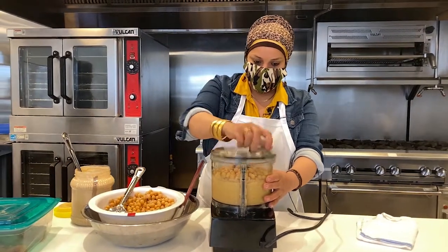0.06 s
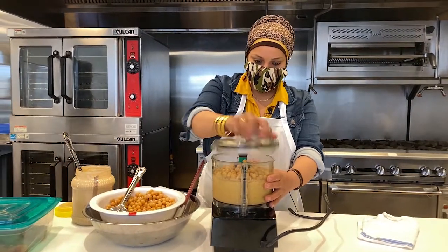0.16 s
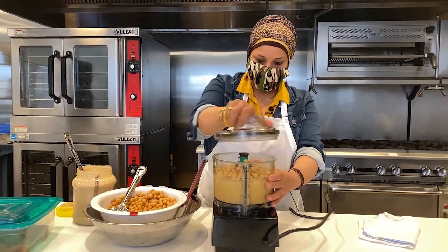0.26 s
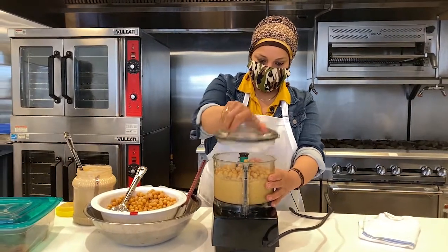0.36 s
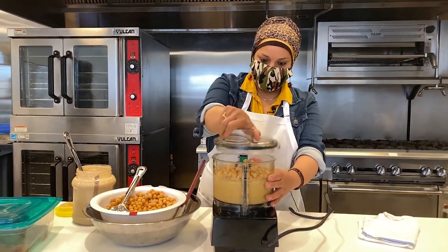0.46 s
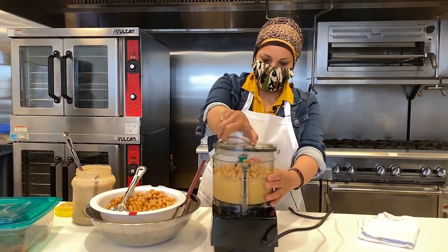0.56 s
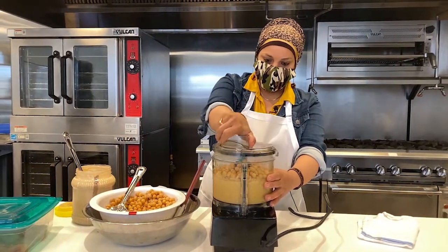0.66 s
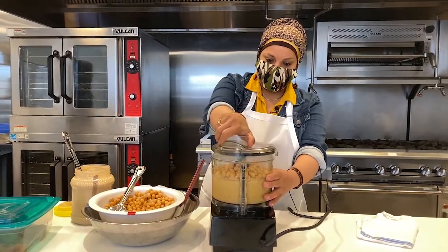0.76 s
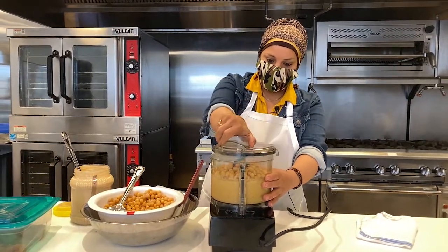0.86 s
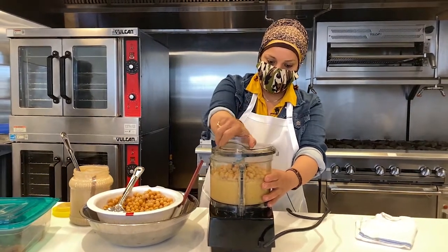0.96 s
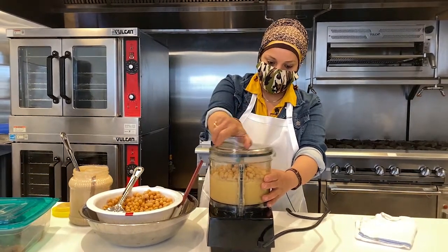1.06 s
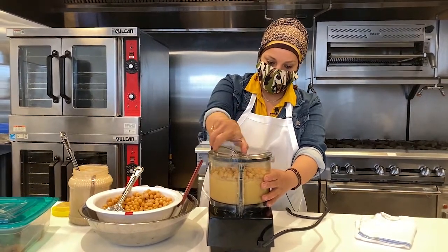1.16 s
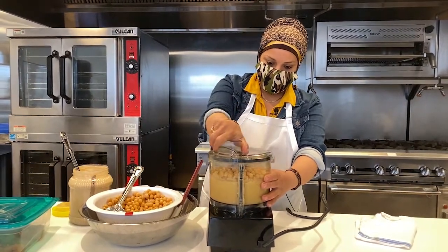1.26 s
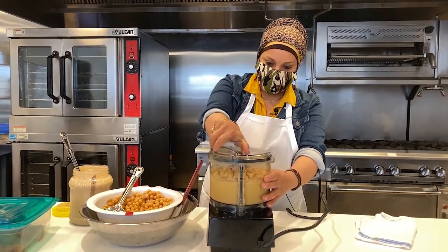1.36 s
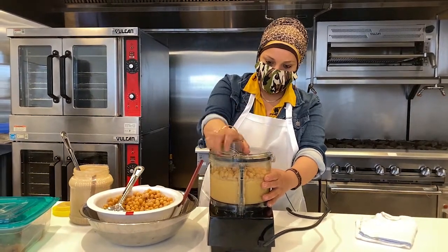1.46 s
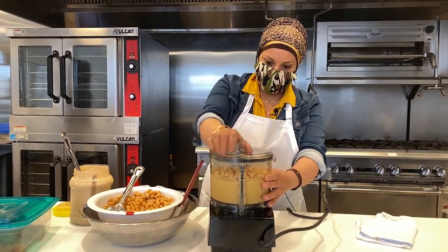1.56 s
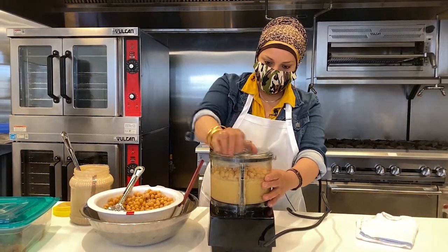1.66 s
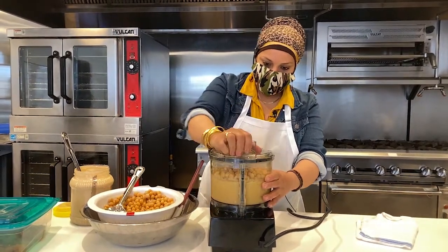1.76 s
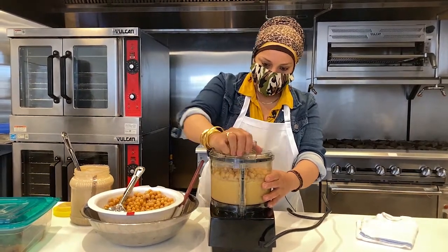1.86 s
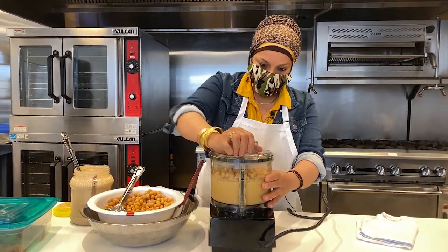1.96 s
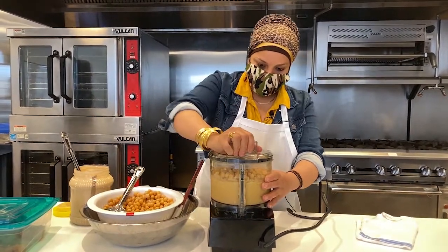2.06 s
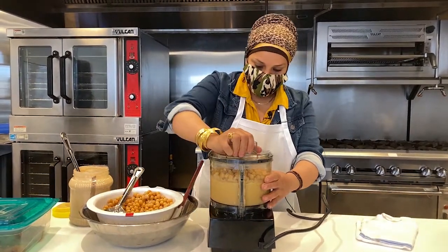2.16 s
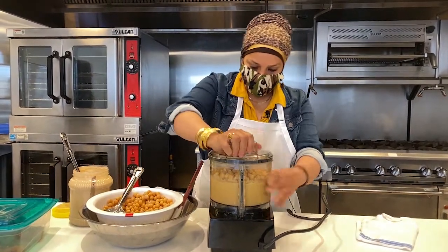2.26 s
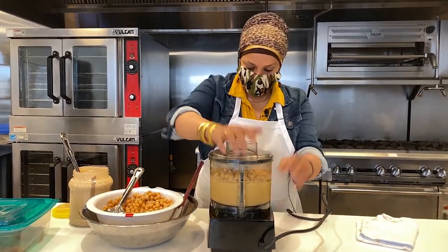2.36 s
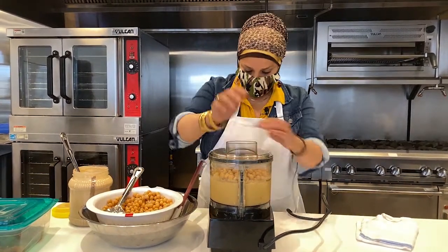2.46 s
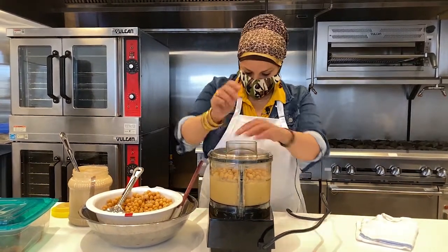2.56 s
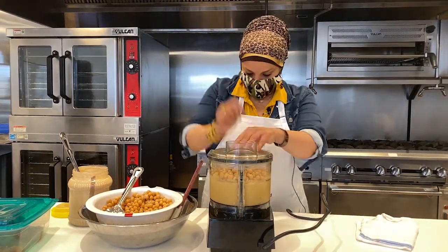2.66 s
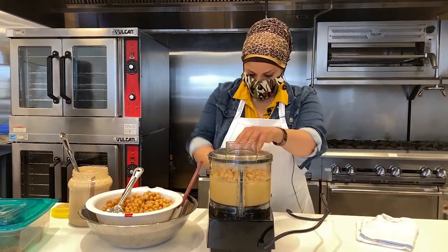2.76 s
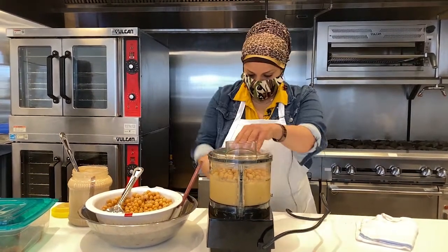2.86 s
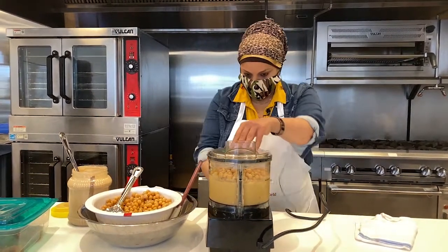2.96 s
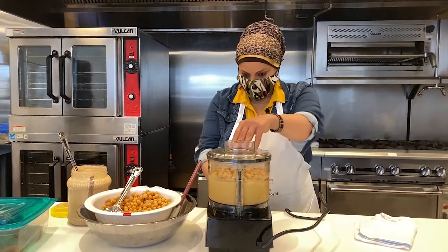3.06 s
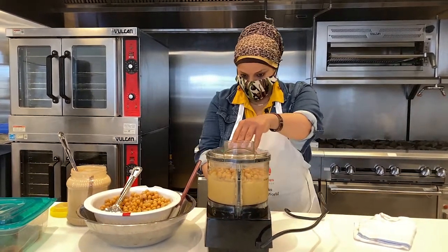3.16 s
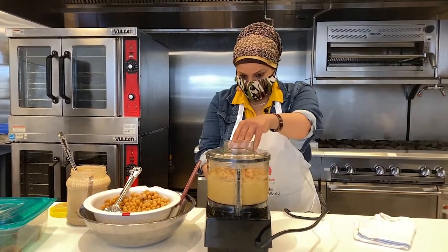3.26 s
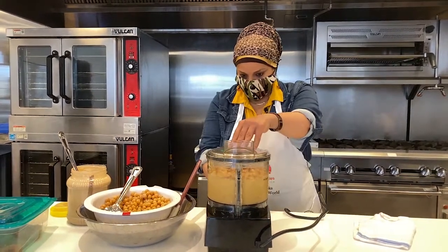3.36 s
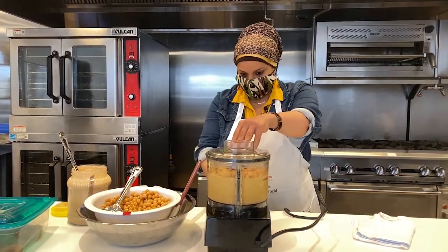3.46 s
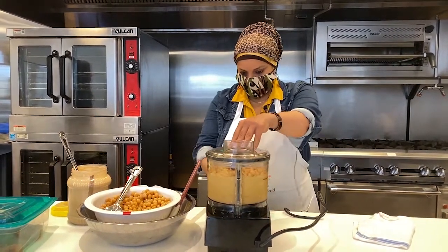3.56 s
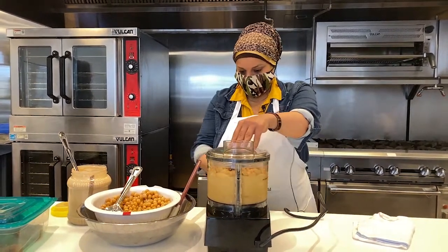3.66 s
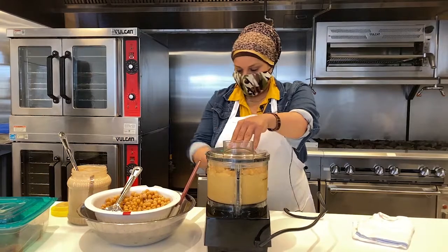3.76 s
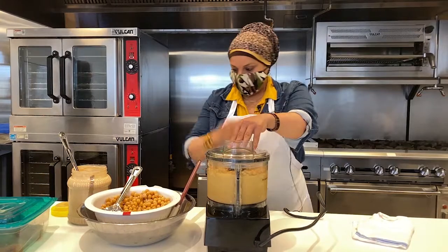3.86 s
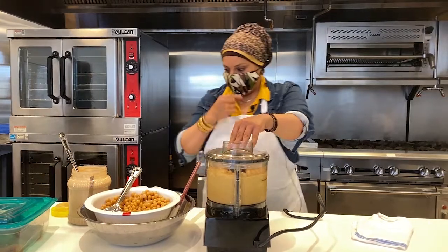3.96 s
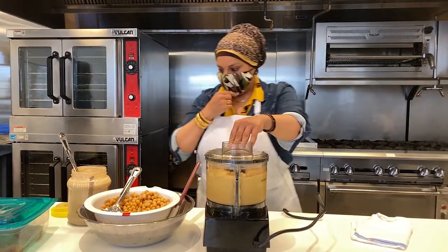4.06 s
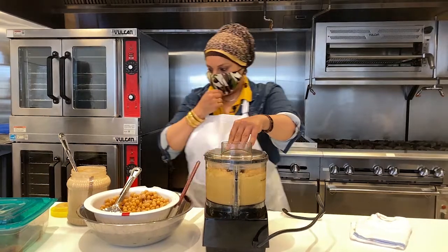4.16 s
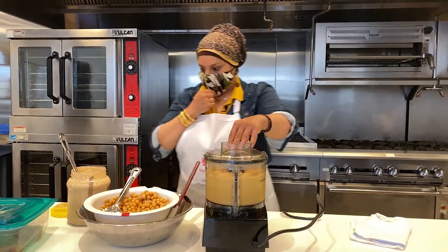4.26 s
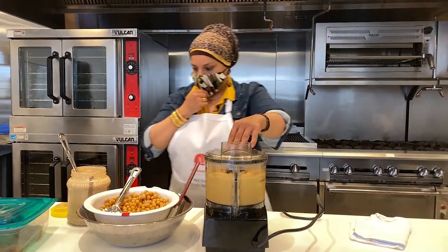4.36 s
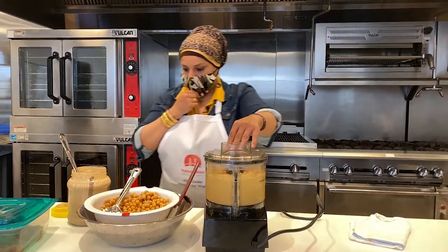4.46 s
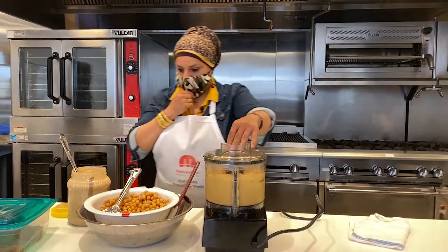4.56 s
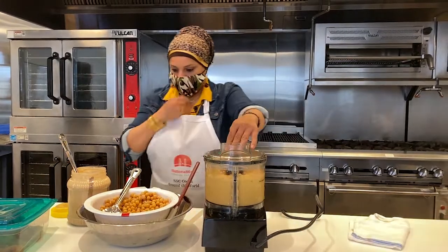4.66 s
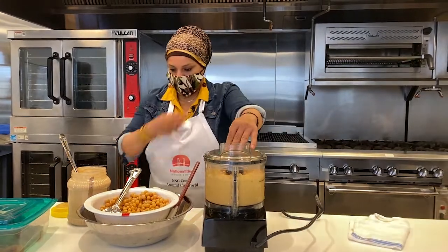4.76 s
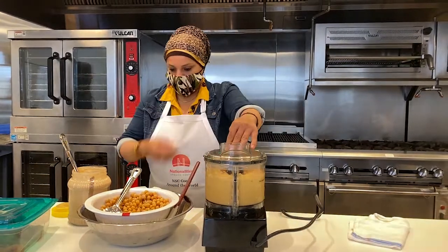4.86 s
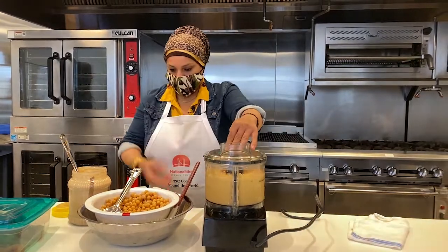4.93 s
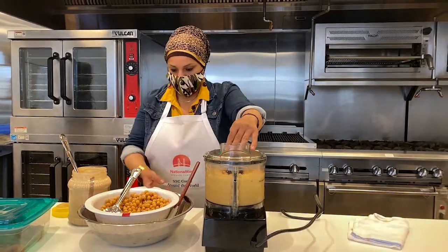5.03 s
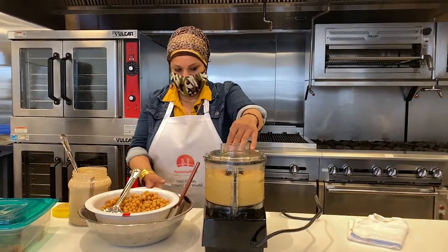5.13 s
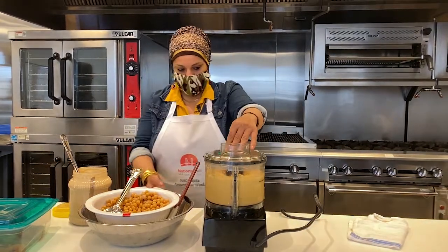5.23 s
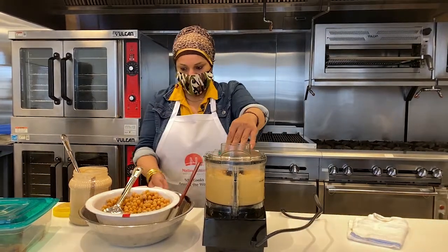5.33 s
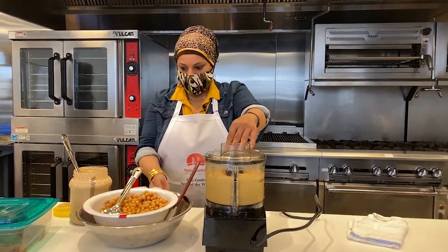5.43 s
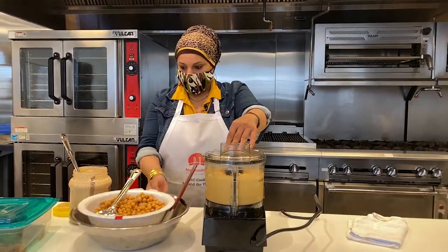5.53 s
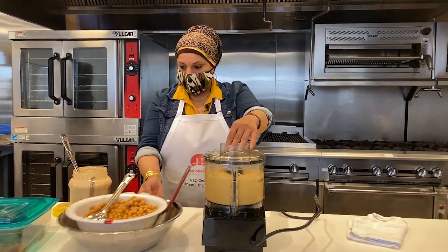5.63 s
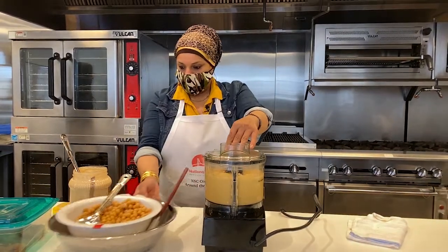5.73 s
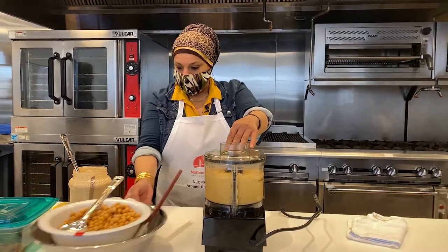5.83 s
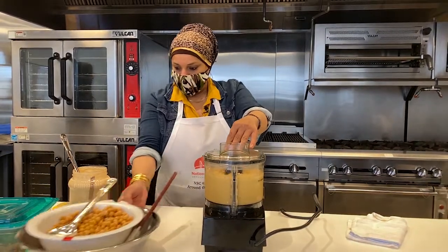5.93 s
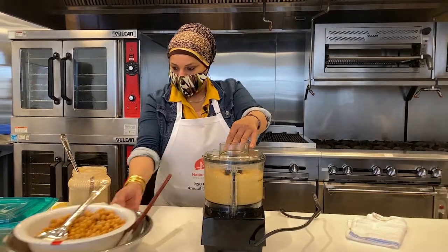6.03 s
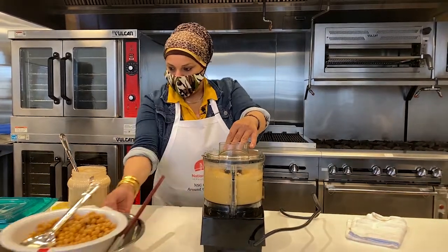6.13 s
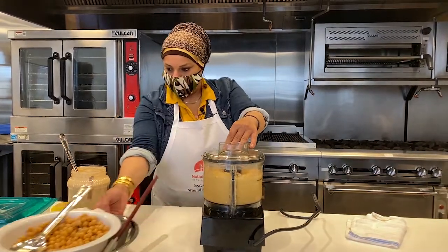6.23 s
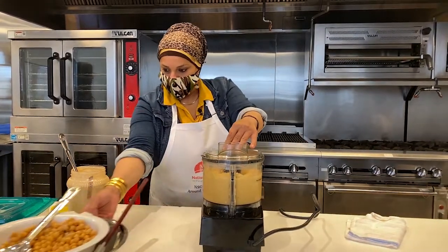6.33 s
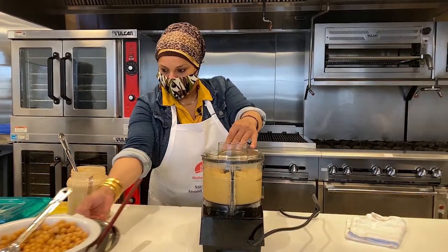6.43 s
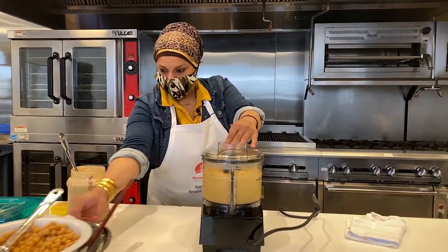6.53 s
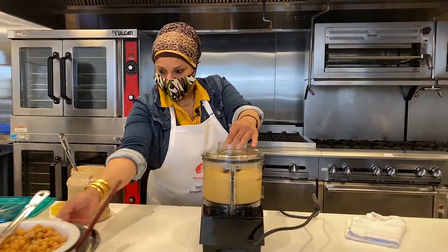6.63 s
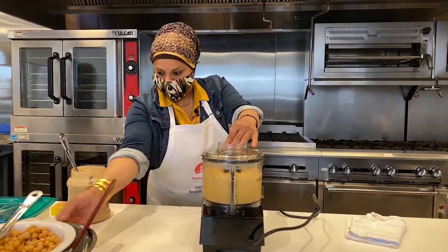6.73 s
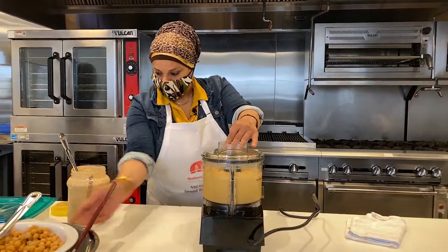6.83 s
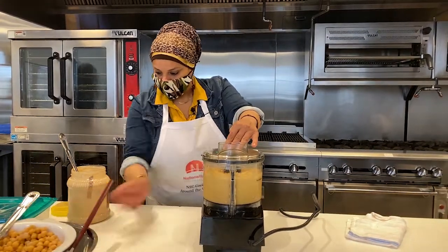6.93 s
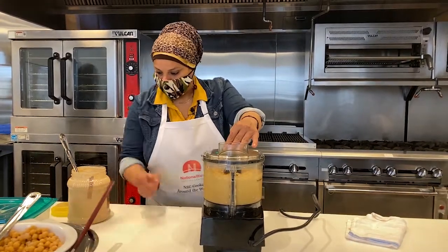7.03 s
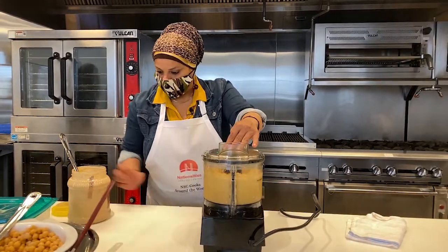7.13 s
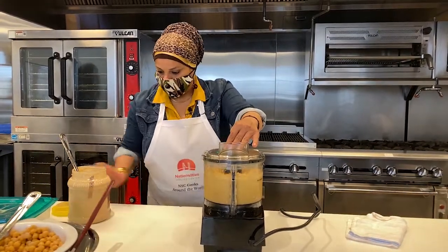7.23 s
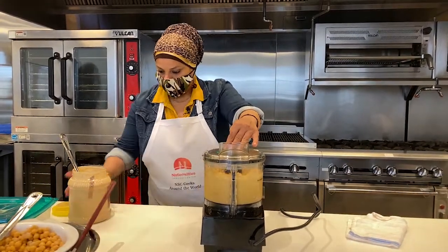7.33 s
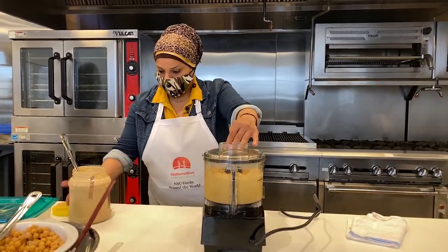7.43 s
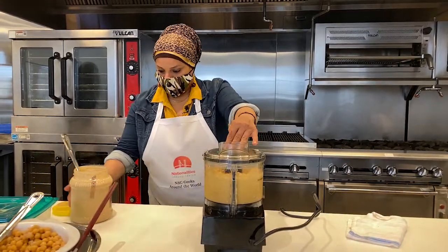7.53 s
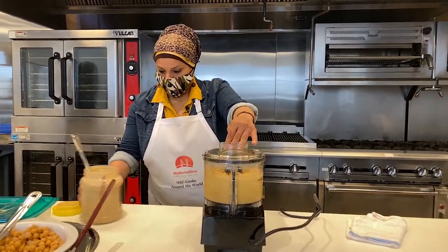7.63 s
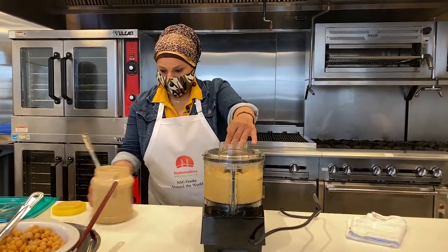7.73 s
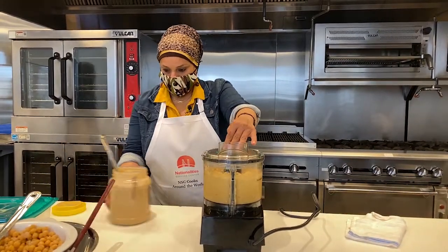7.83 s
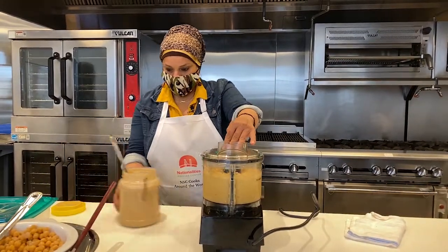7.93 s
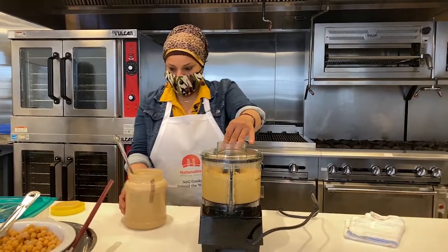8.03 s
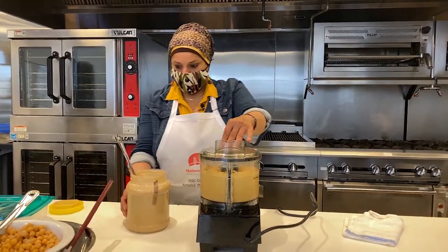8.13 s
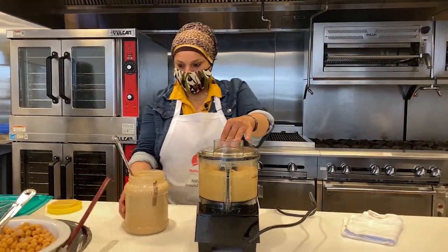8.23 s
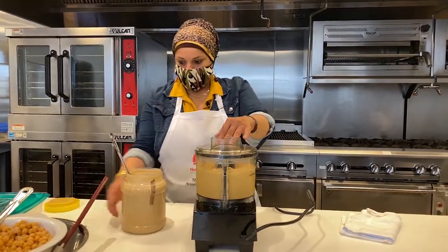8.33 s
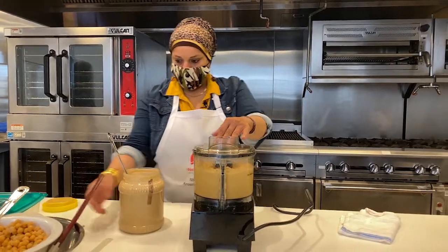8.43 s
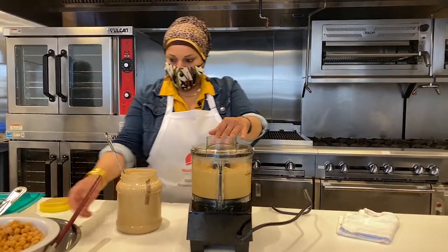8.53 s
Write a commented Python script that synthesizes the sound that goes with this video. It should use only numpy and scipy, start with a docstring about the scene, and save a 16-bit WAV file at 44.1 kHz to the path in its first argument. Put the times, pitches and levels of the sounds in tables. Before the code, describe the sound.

In a large hard kitchen with low ventilation rumble, a plastic lid knocks and scrapes on a processor bowl while thin bangles jingle. A clustered rattle, then a loud snap as it locks. After a short pause a switch clacks and the motor hums up at once, churning chickpeas in a rough wet roar with hard ticks against the wall, running on to the end. Fairly close microphone, light room ring.

```python
"""Food processor in a kitchen

In a large hard kitchen a plastic lid is fitted on a processor bowl: knocks and scrapes ring damped modes, and
dry clicks snap. Bangles jingle as noise and tones in high zones; a switch clacks as a band of noise. The
induction motor hums at multiples of its magnetic pull with side tones from its shaft. The blade churns
chickpeas, a patchy shaped noise with bowl resonances, and flings some at the wall as hard ticks. Ventilation
rumbles underneath; a low mains hum and a faint whine sit over it."""
import sys
import numpy as np
from scipy import signal
from scipy.io import wavfile
from scipy.ndimage import uniform_filter1d

SR = 44100
rng = np.random.default_rng(int(sys.argv[2]) if len(sys.argv) > 2 else 0)


def inscribe(sig):
    """Save sig as 16-bit PCM at rate SR to the path in sys.argv[1].

    A 1-D sig is mono; a 2-D sig holds one channel per row.
    Samples are clipped to [-1, 1] before scaling.
    """
    pcm = np.round(np.clip(np.atleast_2d(sig).T, -1, 1) * 32767)
    wavfile.write(sys.argv[1], SR, pcm.astype(np.int16))


def boost_factor(decibels):
    """Convert a level in decibels to a linear amplitude factor."""
    exponent = np.asarray(decibels, float) / 20
    return 10 ** exponent


N = 378819
T = np.arange(N) / SR
START_S, SPIN_UP_S = 3.14, 0.12


def evened(x):
    """Scales to rms 1."""
    return x / np.sqrt(np.mean(x ** 2) + 1e-20)


def read(points, hz):
    """Interpolates a spectrum table on a log frequency axis."""
    f, value = np.transpose(points)
    return np.interp(np.log(hz + 1), np.log(f + 1), value)


def add(mix, start_s, sound):
    """Lays a sound into the mix, cut at its end."""
    part = mix[round(start_s * SR):][:len(sound)]
    part += sound[:len(part)]


def add_peak(mix, start_s, peak_db, sound):
    """Lays a sound into the mix at a set peak."""
    add(mix, start_s, boost_factor(peak_db) * sound / abs(sound).max())


def band(x, lo_hz, hi_hz):
    """Band-pass filter."""
    return signal.sosfilt(signal.butter(2, [lo_hz, hi_hz], "band", fs=SR, output="sos"), x)


def fade(count, t60_s):
    """Exponential decay."""
    return boost_factor(-60 * np.arange(count) / SR / t60_s)


def pulse(count, t60_s, rise_t60_s):
    """Exponential decay with a rounded onset."""
    return fade(count, t60_s) * (1 - fade(count, rise_t60_s))


def drift(rate_hz):
    """Slow complex noise of rms 1, drawn every 16 samples."""
    step = 16
    a, b = rng.standard_normal((N // step + 2, 2)).T
    z = signal.lfilter([1], [1, -np.exp(-2 * np.pi * rate_hz * step / SR)], a + 1j * b)
    return np.interp(np.arange(N) / step, np.arange(len(z)), z) / np.sqrt(np.mean(abs(z) ** 2))


def wavering(strength, cycles, rms_db=0):
    """Tone whose level and phase follow a complex strength."""
    return boost_factor(rms_db) * np.sqrt(2) * (strength * np.exp(2j * np.pi * cycles)).real


def hiss(field_db, size):
    """Noise from random short-time spectra whose level is field_db(seconds, Hz)."""
    frames, hz = 4 * N // size + 5, np.fft.rfftfreq(size, 1 / SR)
    a, b = rng.standard_normal((frames, len(hz), 2)).T
    z = (a + 1j * b) * boost_factor(field_db(np.arange(frames) * size / 4 / SR, hz[:, None]))
    return signal.istft(z, nperseg=size, noverlap=3 * size // 4)[1][:N]


# Room decay. Each row: frequency in Hz, t60 in s.
ROOM_DECAY = [(200, 1), (600, 0.37), (1500, 0.7), (4000, 0.7), (7000, 0.6), (12000, 0.36)]


def echoes():
    """Reverberant tail: noise dying band by band, drawn anew at each call as for another spot in the room."""
    hz, t, z = signal.stft(rng.standard_normal(SR // 2), SR, nperseg=256)
    decay = boost_factor(-60 * t / read(ROOM_DECAY, hz)[:, None])
    tail = signal.istft(z * decay, SR, nperseg=256)[1][:SR // 2]
    return tail * (1 - fade(len(tail), 0.0026))


# Modes of bowl and lid. Each row: frequency in Hz, relative level in dB, longest t60 in s.
BOWL_MODES = [(232.4, -5.5, 0.19), (254.3, 5.5, 0.085), (297, -2.5, 0.074), (346, 1.5, 0.043),
              (408, -1, 0.29), (474, 15.5, 0.037), (590, 9, 0.024), (696, 23.5, 0.015), (880, 1, 0.055),
              (1180, -7.5, 0.061), (1240, 5.5, 0.23), (1627, -11, 0.044), (1716, -9.5, 0.074),
              (1770, -6, 0.12), (2340, -5, 0.026), (2517, 0, 0.025), (3020, 12, 0.0098),
              (3236, -0.5, 0.036), (3600, 10, 0.025), (3850, 5.5, 0.017), (4150, -7, 0.03),
              (4660, -4.5, 0.034), (5300, 0.5, 0.033)]


def struck(favoured_hz, count=SR // 3):
    """Modes of one contact, varied in strength and tuning; the spot hit favours modes near one pitch."""
    max_cycles = 110  # plastic damps any mode within this t60
    hz, db, t60_s = np.transpose(BOWL_MODES)[:, :, None]
    t60_s = np.minimum(t60_s, max_cycles / hz)
    t = np.arange(count) / SR
    strength, tuning = rng.standard_normal((2, len(BOWL_MODES), 1))
    near = np.exp(-(np.log(hz / favoured_hz) / 0.091) ** 2)
    swell = 1 - np.exp(-t * hz / 2.33)
    level_db = db + 2.0 * strength + 19 * near - 60 * t / t60_s
    return swell * boost_factor(level_db) * np.sin(2 * np.pi * hz * (1 + 0.024 * tuning) * t)


# Edges of the five parts, boom, lid knock, rim, latch and crack, in Hz.
PART_EDGES = [150, 380, 1350, 2800, 5800, 16000]


def part_modes(modes, k):
    """Sum of the bowl modes in part k."""
    part_of = np.digitize(np.transpose(BOWL_MODES)[0], PART_EDGES) - 1
    return modes[part_of == k].sum(0)


def part_noise(x, k):
    None
    tilted = signal.lfilter([1], [1, -0.55], x)  # falls off in the treble
    return (-1) ** k * band(tilted, *PART_EDGES[k:k + 2])


# Middles of lid knock, rim, latch and crack, in Hz.
PART_MIDDLES = [720, 1950, 4000, 9600]


def shares(db, favoured_hz, below_db_per_octave, above_db_per_octave):
    """Levels of lid knock, rim, latch and crack: loudest at the part nearest the favoured mode."""
    octaves = np.log2(np.array(PART_MIDDLES) / favoured_hz)
    fall = np.where(octaves < 0, -below_db_per_octave * octaves, above_db_per_octave * octaves)
    return list(db - fall + fall.min())


# Ventilation colour. Each row: frequency in Hz, relative density in dB per Hz.
AIR_COLOUR = [(25, -23.5), (45, -4.5), (60, -21.5), (120, 3), (160, -4.5), (200, -5), (300, -13),
              (450, -11.5), (600, -16), (1070, -19.5), (1500, -22.5), (2500, -24), (5000, -34.5),
              (10000, -43), (16000, -52)]
# Each row: frequency in Hz, wavering in Hz, level in dB.
AIR_HUMS = [(60.2, 11, -62), (1063, 0.92, -70)]


def air():
    """Ventilation's shaped noise rumble, with a low mains hum and a faint whine that waver slightly."""
    rumble = evened(hiss(lambda t, hz: read(AIR_COLOUR, hz), size=2048))
    hums = [wavering(1 + 0.21 * drift(waver_hz), hz * T, db) for hz, waver_hz, db in AIR_HUMS]
    return boost_factor(-53) * rumble + sum(hums)


# Bangles knocking together. Each row: start in seconds, peak in dB, larger hoops in dB over their zone level.
BANGLE_HITS = [(.262, -57, 0), (0.344, -32.5, -6), (1.427, -34.5, 9), (1.454, -33, -5), (1.5094, -46, -8),
               (1.632, -42, 9), (1.674, -47, -12), (2.31, -47, -20), (2.607, -34.5, -6.5),
               (2.6504, -36, -9), (2.702, -43, -5), (2.7741, -51, -10)]
# Broad ringing zones of the hoops. Each row: middle in Hz, width in Hz, relative level in dB.
BANGLE_ZONES = [(4000, 700, 3), (5370, 1100, 7), (7100, 1700, 6.5), (9700, 3200, 2.5), (11900, 2500, 6.5),
                (14400, 2200, 5)]


def bangles():
    """Thin hoops rattle: in each high zone three ringing tones over a burst of noise."""
    out, count = np.zeros(N), SR // 4
    t = np.arange(count) / SR
    for start_s, peak_db, large_db in BANGLE_HITS:
        sound = np.zeros(count)
        for hz, width_hz, zone_db in BANGLE_ZONES:
            place, phase = rng.random((2, 3, 1))
            tones = np.sin(2 * np.pi * ((hz + width_hz * (place - 0.5)) * t + phase)).sum(0)
            noise = band(rng.standard_normal(count), hz - width_hz / 2, hz + width_hz / 2)
            zone = evened(noise) + boost_factor(-8) * evened(tones)
            zone_db = zone_db + large_db * (hz < 8500)  # larger hoops sound lower
            sound += boost_factor(zone_db) * zone * fade(count, t60_s=0.17)
        add_peak(out, start_s, peak_db, sound)
    return out


# Lid dragging on bowl. Each row: start in seconds, length in seconds, level in dB, favoured mode in Hz,
# fall in dB per octave away from it, ringing in dB over the rasp.
LID_SCRAPES = [(0.646, 0.065, -45.5, 620, 8, 15), (0.865, 0.053, -44.5, 439, 19, 12),
               (0.897, 0.053, -48, 580, 24, 18), (0.852, 0.077, -69, 3770, 8, 3),
               (1.109, 0.067, -47, 2300, 7, -13), (1.393, 0.037, -60.5, 4270, 6, -15),
               (1.428, 0.096, -53.5, 1790, 7, 4), (1.628, 0.13, -63, 1750, 2, 3),
               (3.032, 0.028, -67.5, 2520, 10, 6), (3.1124, 0.021, -49, 4500, 5.5, -18)]


def scrapes():
    """Dense uneven slips excite the bowl modes, damped by the hand, while the lid drags."""
    out, total = np.zeros(N), SR // 3
    for start_s, length_s, level_db, favoured_hz, fall_db, ring_db in LID_SCRAPES:
        modes = struck(favoured_hz) * fade(total, 0.28)
        count = max(round(length_s * SR), 64)
        drag = np.pad(np.sin(np.pi * np.linspace(0, 1, count) ** 1.04), (0, total - count))
        slips = rng.standard_normal(total) * rng.exponential(1, total) * drag
        for k, db in enumerate(shares(level_db, favoured_hz, fall_db, fall_db), 1):
            rung = signal.fftconvolve(slips, part_modes(modes, k))[:total]
            rasp = part_noise(part_noise(slips, k), k)
            part = rasp / rasp[:count].std() + boost_factor(ring_db) * rung / (rung[:count].std() + 1e-9)
            add(out, start_s, boost_factor(db) * part / np.hypot(1, boost_factor(ring_db)) * 2)
    return out


# Dry clicks of the plastic. Each row: start in seconds, peak in dB.
DRY_CLICKS = [(0.34, -27), (.651, -51), (.671, -53), (.786, -54), (1.0948, -41), (1.1065, -35),
              (1.114, -27), (1.123, -38), (1.1315, -36), (1.1368, -18.5), (1.143, -37), (1.4283, -31),
              (1.9364, -38), (1.9412, -13), (3.1342, -9)]


def clicks():
    """Each click is short, dry and wide."""
    out = np.zeros(N)
    for start_s, peak_db in DRY_CLICKS:
        click = band(rng.standard_normal(1200), 2200, 8000)
        add_peak(out, start_s, peak_db, click * pulse(1200, t60_s=0.0057, rise_t60_s=0.0016))
    return out


# Knocks and clicks of the plastic. Each row: start in seconds, level of the loudest upper part in dB,
# favoured mode in Hz, bowl boom peak in dB, reverberation in dB relative to each part.
PLASTIC_KNOCKS = [(0.089, -55, 3600, -70, -25), (.342, -23, 3340, -58, -14.5), (.343, -25, 4600, -58, -22),
                  (0.65, -36.5, 1240, -62, -27), (.653, -46, 3500, -60, -28), (.671, -52, 3650, -63, -28),
                  (0.671, -32.5, 1240, -47, -20), (0.805, -53, 1240, -59, -28), (1.0963, -33.5, 1760, -31, -28),
                  (1.107, -29, 1730, -31, -30), (1.114, -31, 3850, -26, -29), (1.118, -35, 1750, -18.5, -28),
                  (1.132, -30, 2400, -27, -20), (1.137, -22.5, 3020, -25, -23), (1.14, -21, 696, -15.5, -21),
                  (1.185, -38, 1750, -22.5, -27), (1.239, -51, 1750, -27.5, -26),
                  (1.427, -20, 3170, -28.5, -21), (1.463, -31, 1780, -32, -29), (1.49, -37, 1780, -37, -30),
                  (1.466, -34, 3240, -59, -32), (1.491, -44, 3200, -60, -30), (1.636, -38.5, 1740, -57, -26),
                  (1.665, -45, 1750, -62, -27), (1.688, -28.5, 5300, -64, -14), (1.688, -37.5, 1740, -64, -29),
                  (1.689, -31, 3700, -47, -22), (1.9408, -12, 4150, -44, -11), (1.942, -38.5, 2420, -59, 1),
                  (1.943, -13, 1670, -30.5, -15.5), (2.287, -47, 4150, -56, -18),
                  (3.134, -13, 4170, -43.5, -11), (3.136, -26.5, 880, -49, -16)]
# How readily each of the five parts fills the room, in dB.
PART_ECHO_DB = [-4, -0.5, -6, -16.5, -6.5]


def knocks():
    """Every blow rings the same plastic modes over a crack, then the room; its spot sets each part's share."""
    crack_db, crack_db_per_db = -4, 0.67  # harder blows crack brighter
    out = np.zeros(N)
    for start_s, peak_db, favoured_hz, boom_db, room_db in PLASTIC_KNOCKS:
        upper_db = shares(peak_db, favoured_hz, below_db_per_octave=11, above_db_per_octave=6.5)[:3]
        part_db = [boom_db, *upper_db, upper_db[-1] + crack_db + crack_db_per_db * peak_db]
        modes, tail = struck(favoured_hz), echoes()
        count = modes.shape[1]
        crack = rng.standard_normal(count) * pulse(count, t60_s=0.04, rise_t60_s=0.006)
        for k, db in enumerate(part_db):
            rung = part_modes(modes, k)
            add_peak(out, start_s, db, rung + (0.9 + 0.32 * k) * part_noise(crack, k))
            onset = (rung * fade(count, 0.27))[:2000]  # the room spreads mostly the first moments
            spread = signal.fftconvolve(tail, onset)[:len(tail)]
            room = evened(part_noise(tail, k)) + 0.9 * evened(spread)
            echo_db = db + room_db + PART_ECHO_DB[k]
            add(out, start_s, boost_factor(echo_db) * room / room[:SR // 20].std())
    return out


def switch():
    """The rocker's dry clack: short broad noise with no clear pitch."""
    out, lo_hz, hi_hz = np.zeros(N), 1980, 4600
    clack = band(band(rng.standard_normal(2000), lo_hz, hi_hz), lo_hz, hi_hz)
    add_peak(out, 3.1332, -7.5, clack * pulse(2000, t60_s=0.026, rise_t60_s=0.0049))
    return out


# Motor tones. Each row: multiple of the pull, multiple of the shaft, level in dB while whole peas jolt the blade,
# level in dB once they are paste, unsteady share, wavering in Hz.
MOTOR_ORDERS = [(0, 2, -72, -57.5, 0.14, 4.4), (1, -1, -69, -62, .2, 4), (1, 0, -53, -50.5, 0.19, 4),
                (1, 1, -52, -50, .2, 3.6), (1, 2, -36.5, -45.5, 0.36, 3.9), (2, -1.5, -37, -48, 0.95, 4.8),
                (2, -1, -40.5, -43, 0.17, 8.9), (2, -.5, -37.5, -60, 0.88, 5.2),
                (2, 0, -62, -49.5, 0.54, 6), (2, .5, -52, -54, 0.33, 5.4), (2, 1, -56, -37.5, .6, 6),
                (2, 2, -66, -58, 0.77, 6.9), (2, 3, -56, -56, 0.64, 3.9), (2, 5, -45.5, -53, 1.2, 10.4),
                (2, 7, -50, -47.5, 1, 17)]
# Load still whole peas. Each row: time in seconds, share from 0 to 1.
WHOLE_PEAS = [(3.19, 0), (3.4, 0.9), (3.65, 1), (4.2, 0.8), (4.6, 0.18), (5.5, 0.02), (8.59, 0.05)]


def motor():
    """The pull beats at twice the mains, the shaft shakes side tones off it; load shifts level between them."""
    shaft_hz, pull_hz = 29.05, 120
    throb_db, throb_hz = 2.36, 5.4
    spin = np.clip((T - START_S) / SPIN_UP_S, 0, 1)
    turns = np.cumsum(shaft_hz * (1 - 0.3 * (1 - spin) ** 2)) / SR
    whole = np.interp(T, *np.transpose(WHOLE_PEAS))
    lurch_db = 12.5 * np.exp(-((T - 3.29) / 0.032) ** 2)  # the base lurches once as the blade bites
    out = np.zeros(N)
    for pull, shaft, whole_db, paste_db, loose, waver_hz in MOTOR_ORDERS:
        throb = uniform_filter1d(drift(throb_hz).real, size=1500)
        level_db = paste_db + whole * (whole_db - paste_db) + throb_db * throb
        if pull == 1 and shaft < 2:
            level_db += lurch_db
        shake = np.sqrt(1 - min(loose, 1) ** 2) + loose * drift(waver_hz)
        out += wavering(shake, pull * pull_hz * T + shaft * turns, level_db)
    return np.sqrt(spin) * out


def grains(per_s, fall_s):
    """Random hits of uneven strength, each decaying exponentially."""
    strength = boost_factor(3.5 * np.minimum(rng.exponential(1, N), 3))
    hits = (rng.random(N) < per_s / SR) * strength
    return signal.lfilter([1], [1, -np.exp(-1 / (fall_s * SR))], hits)


def patches(bins, frames, shape):
    """Smoothed chance of rms 1 over frequency bins and time frames."""
    return evened(uniform_filter1d(uniform_filter1d(rng.standard_normal(shape), bins, 0), frames, 1))


# Churning food. Each row: time in seconds, level in dB, low slosh in dB, played relative to its median.
CHURN_LEVELS = [(3.14, -46, -10), (3.15, -44, 4), (3.18, -46, 16), (3.205, -33.5, 5.5), (3.23, -26.5, -9),
                (3.35, -28, 0.5), (3.7, -27, -2), (3.73, -22.5, -4), (3.82, -27.5, -3.5),
                (4.7, -28.5, -3.5), (5.46, -28.5, -0.5), (6.8, -27.5, -12.5), (8.41, -28.5, -13),
                (8.59, -27.5, -12)]
# Roar colour. Each row: frequency in Hz, relative density in dB per Hz.
ROAR_COLOUR = [(100, -34), (165, -29), (200, -6), (330, -2), (500, -9), (620, -4.5), (740, -9.5), (860, -6),
               (1000, -10.5), (1700, -5), (2300, -7.5), (3100, -3.5), (4150, -8), (4450, -13), (6800, -16),
               (8000, -23.5), (9500, -21.5), (12000, -28), (14000, -22), (16000, -36.5)]
# Bowl resonances that grow as the paste thickens. Each row: frequency in Hz, width in Hz,
# level in dB at the median churn level, time grown in seconds.
PASTE_RINGS = [(1240, 23, -42, 3.5), (1826, 110, -36, 11), (2907, 35, -42.5, 3.5), (4786, 43, -43.5, 6.8)]


def churn():
    """A patchy roar of wet food, dense grit against the wall, and bowl resonances that follow its level."""
    s, level_db, slosh_db = np.transpose(CHURN_LEVELS)

    def field_db(t, hz):
        """Colour, tilted by the slosh, with patches and wide flicker."""
        shape = len(hz), len(t)
        low = np.clip(np.log2(900 / (hz + 1)), 0, 1)
        tilt = low * np.interp(t, s, slosh_db - np.median(slosh_db))
        uneven = 1.2 * patches(20, 5, shape) + 0.81 * patches(9, 28, shape)
        flicker = 1.4 * rng.standard_normal(len(t)) * (1 - low)
        return read(ROAR_COLOUR, hz) + tilt + uneven + flicker

    roar = hiss(field_db, size=1024)
    roar /= band(roar, 1500, 6000).std()
    grit = 0.38 * grains(per_s=150, fall_s=0.00073) * band(roar, 4600, 19000)
    grit += 0.15 * grains(per_s=220, fall_s=0.0006) * band(roar, 900, 7000)
    rings = np.zeros(N)
    for hz, width_hz, db, grown_s in PASTE_RINGS:
        swell_db = 1.5 * drift(2.5).real
        growth_db = 6.9 * np.tanh(np.minimum(T - grown_s, 0) / 0.35)
        ring_db = db - np.median(level_db) + swell_db + growth_db
        rings += wavering(drift(width_hz / 2), hz * T, ring_db)
    return boost_factor(np.interp(T, s, level_db, left=-120)) * (roar + grit + rings)


def scatter(count, db):
    """Rows of time and level for small hits at random while the blade runs."""
    when, size = rng.random((count, 2)).T
    first_s = START_S + SPIN_UP_S
    return list(zip(first_s + when * (N / SR - first_s), db - 11.5 * np.log(size + 0.51)))


# Peas flung hard at the wall. Each row: start in seconds, peak in dB, pitch of the knock in Hz.
FLUNG_PEAS = [(3.2196, -11, 3150), (3.22, -15.5, 6000), (3.28, -24, 6040), (3.3006, -12, 2830),
              (3.351, -19.5, 6300), (3.4851, -12, 3070), (3.5985, -13, 2100), (3.7241, -10, 3700),
              (3.748, -11, 3360), (3.787, -16, 2400), (3.8975, -9, 3000), (4.22, -15, 3000),
              (4.4957, -14, 2420), (4.5548, -12.5, 4250), (5.1688, -15, 2580), (5.3861, -17, 4500),
              (6.5582, -15, 3220), (6.6874, -11, 2930), (6.7568, -7, 2880), (6.82, -17, 4730),
              (7.1057, -17.5, 3400), (7.1432, -6, 3670), (7.168, -15, 3400), (7.3232, -16, 5600),
              (7.5257, -21.5, 5000), (7.615, -20, 1790), (7.8014, -12, 4400), (7.831, -18, 3460),
              (7.8647, -17, 4500), (8.0091, -17, 4500), (8.22, -10.5, 3400), (8.2565, -12, 1990),
              (8.3494, -16.5, 3300), (8.425, -14, 3340), (8.5005, -13.5, 5550), (8.5007, -9, 3000)]
# Bright spatter ticks. Each row: start in seconds, peak in dB.
SPATTER_TICKS = [(3.2167, -16), (4.0, -26), (4.22, -14), (4.5183, -7), (4.5537, -23), (4.6849, -19),
                 (6.2055, -20), (6.2319, -20), (6.606, -16), (6.7557, -23), (7.1802, -22), (7.4716, -16),
                 (7.6881, -24), (7.726, -13), (7.8298, -20.5), (7.8677, -25), (7.8861, -15), (8.2565, -22),
                 (8.2777, -15), (8.405, -18)]


def peas():
    """Hard ticks on the wall ring its upper modes, with brighter spatter; small ones scatter between."""
    out, spread = np.zeros(N), 1.36  # noise spans the pitch divided and multiplied by the spread
    small = [(s, db, rng.uniform(1990, 5350)) for s, db in scatter(count=45, db=-19.5)]
    for start_s, peak_db, hz in list(FLUNG_PEAS) + small:
        modes = struck(hz, count=2000)[11:].sum(0)  # upper modes only
        noise = rng.standard_normal(2000)
        knock = 0.99 * modes / abs(modes).max()
        knock += 0.57 * evened(band(noise, hz / spread, hz * spread))
        knock += 0.5 * band(noise, 2100, 8800)
        add_peak(out, start_s, peak_db, knock * pulse(2000, t60_s=0.017, rise_t60_s=0.0022))
    for start_s, peak_db in list(SPATTER_TICKS) + scatter(count=80, db=-27.5):
        tick = band(rng.standard_normal(1500), 3000, 14800)
        add_peak(out, start_s, peak_db, tick * pulse(1500, t60_s=0.003, rise_t60_s=0.0038))
    return out


def scene():
    """Blows are heard direct and through the room; steady sounds carry their room in their colour."""
    light, tail = scrapes() + clicks() + switch() + bangles() + peas(), echoes()
    room = signal.fftconvolve(light, tail / np.linalg.norm(tail))[:N]
    return (air() + knocks() + light + boost_factor(-12) * room + motor() + churn())[None]


def top_cut(x):
    """Nothing passes above 16.5 kHz."""
    return signal.sosfilt(signal.butter(12, 16500, fs=SR, output="sos"), x)


def record(dry):
    """The microphone loses the deepest bass; a steep low-pass limits the band."""
    edge_hz = 16250
    thin = signal.sosfilt(signal.butter(3, 42, "high", fs=SR, output="sos"), dry)
    low_pass = signal.firwin(511, edge_hz, window=("kaiser", 9), fs=SR)
    limited = signal.oaconvolve(thin, low_pass[None], "same")
    return top_cut(limited)


dry = scene()
out = record(dry)
inscribe(out)
```